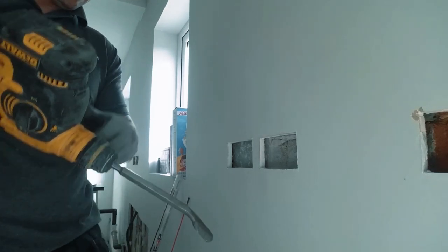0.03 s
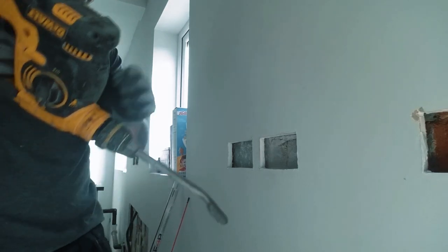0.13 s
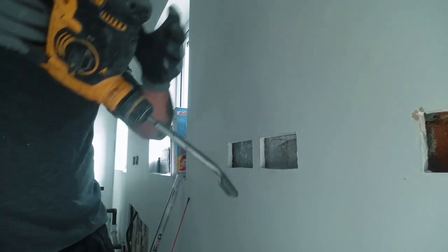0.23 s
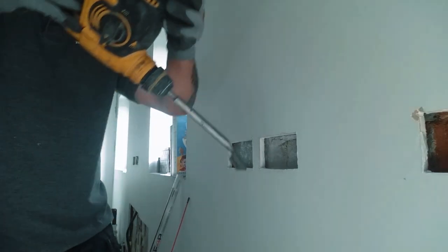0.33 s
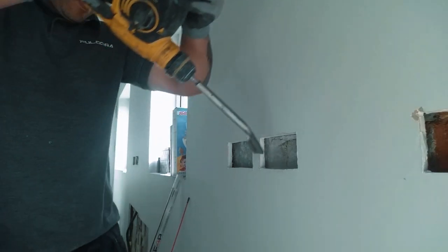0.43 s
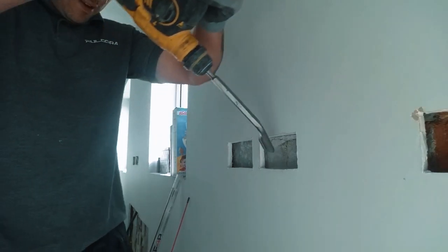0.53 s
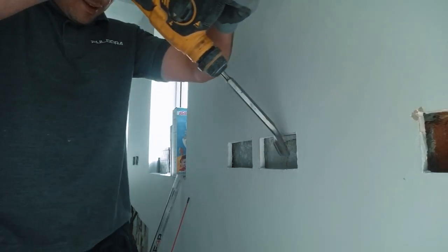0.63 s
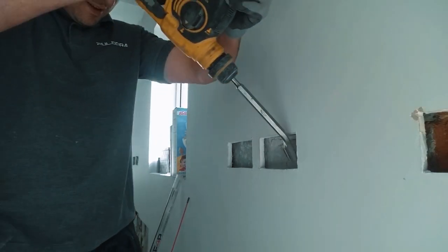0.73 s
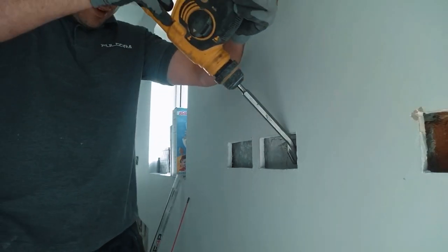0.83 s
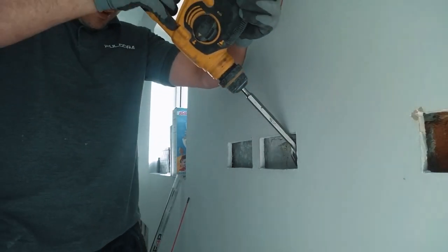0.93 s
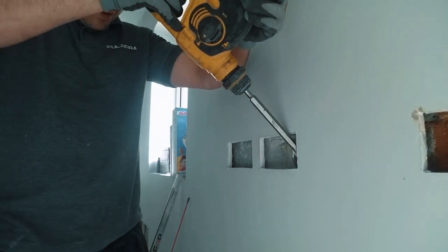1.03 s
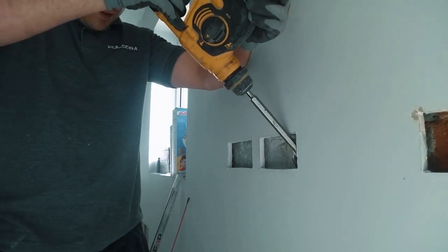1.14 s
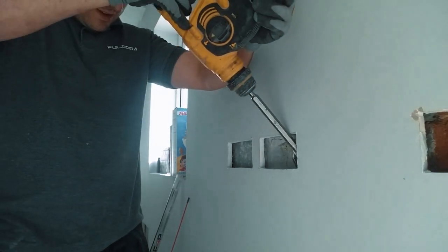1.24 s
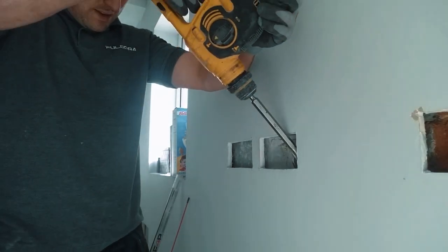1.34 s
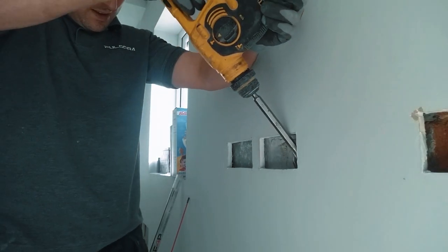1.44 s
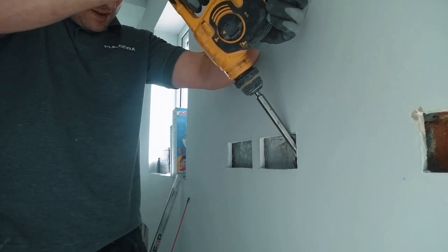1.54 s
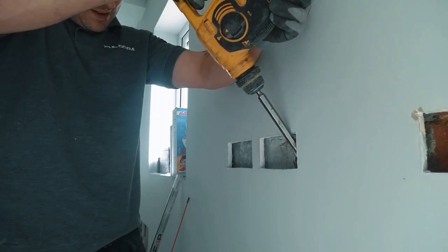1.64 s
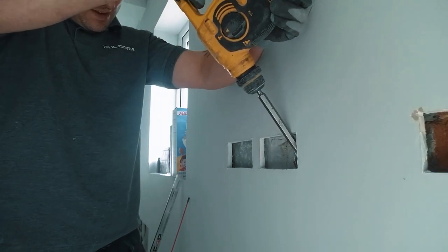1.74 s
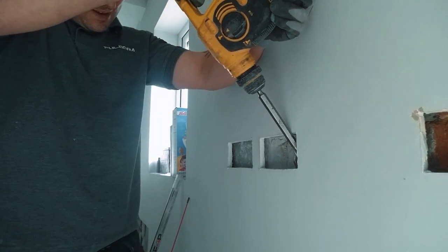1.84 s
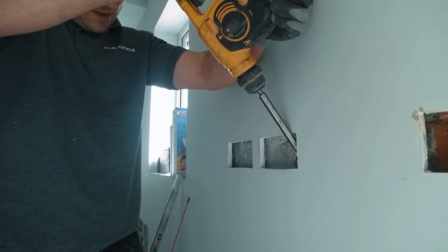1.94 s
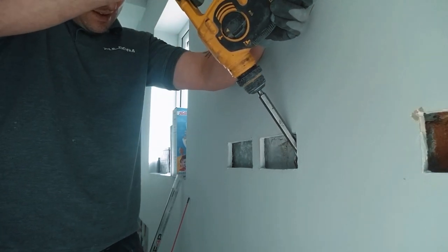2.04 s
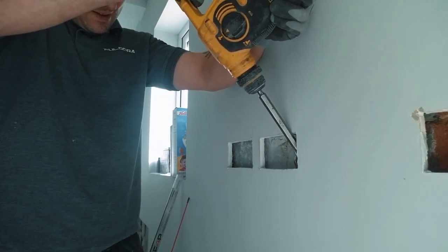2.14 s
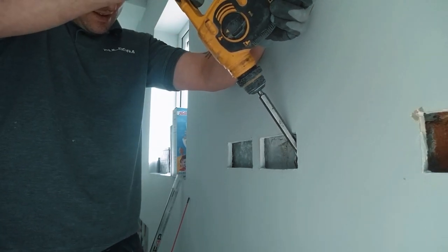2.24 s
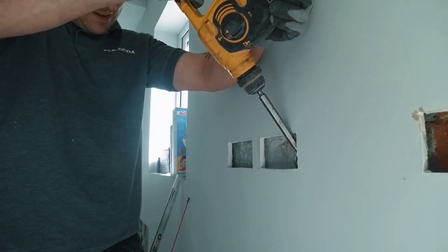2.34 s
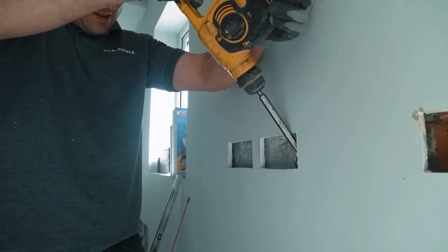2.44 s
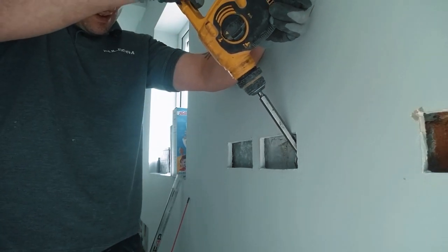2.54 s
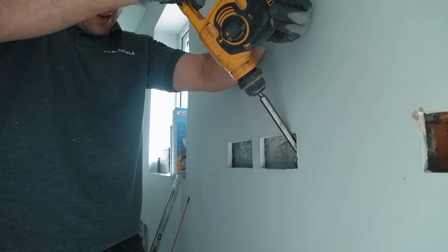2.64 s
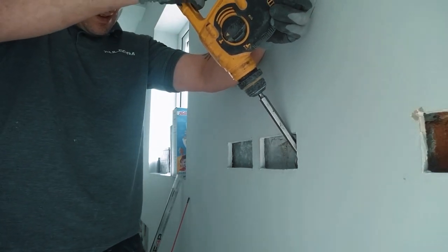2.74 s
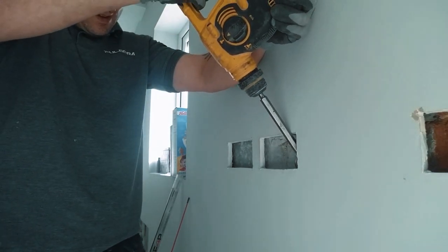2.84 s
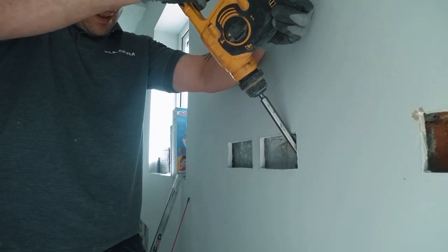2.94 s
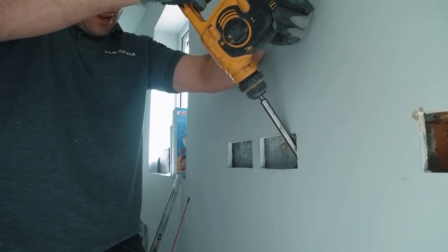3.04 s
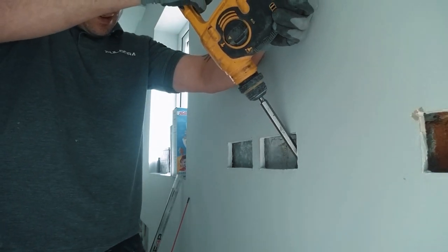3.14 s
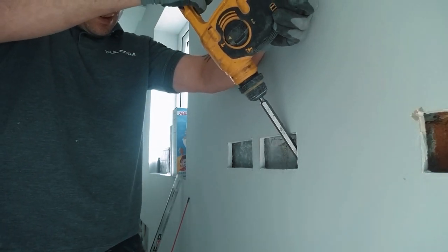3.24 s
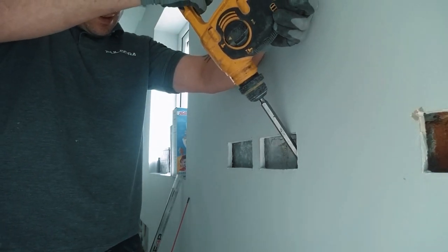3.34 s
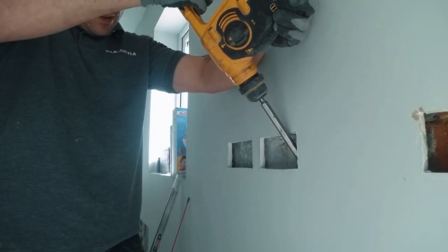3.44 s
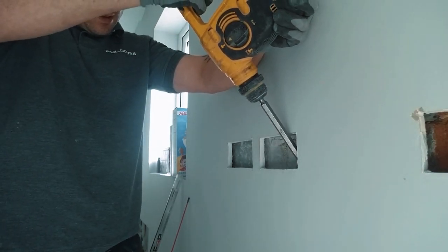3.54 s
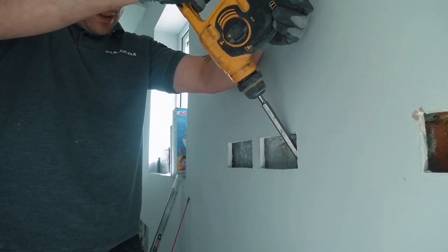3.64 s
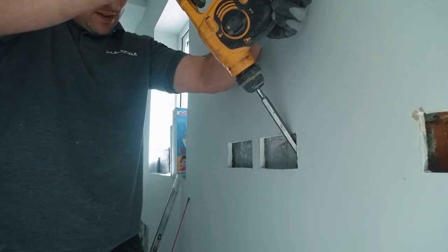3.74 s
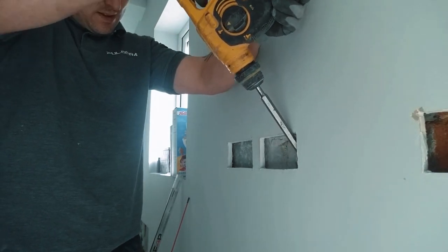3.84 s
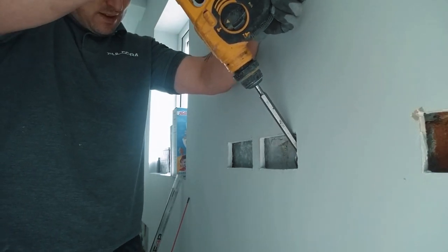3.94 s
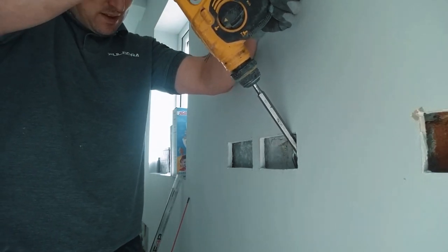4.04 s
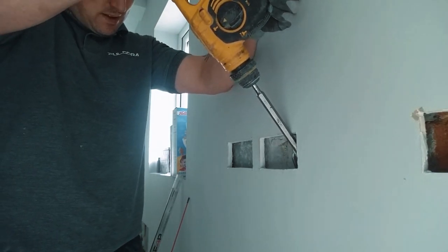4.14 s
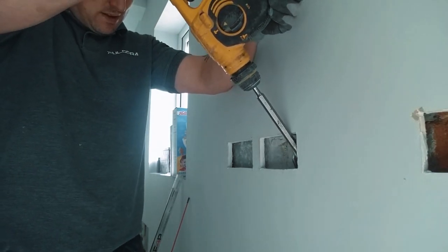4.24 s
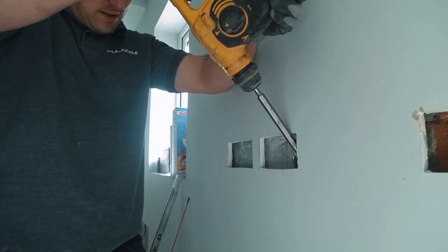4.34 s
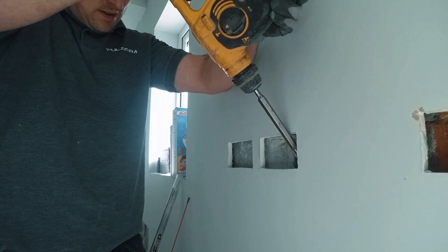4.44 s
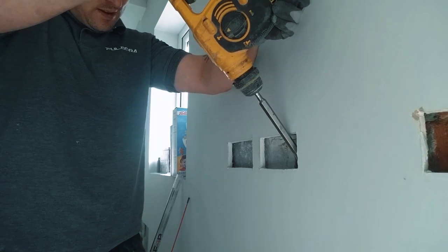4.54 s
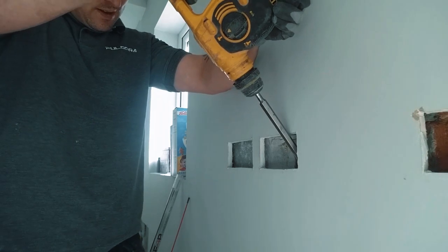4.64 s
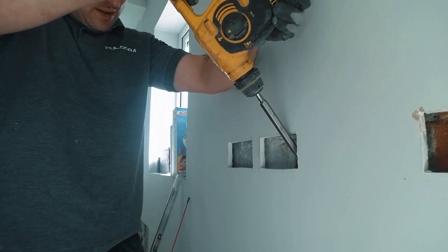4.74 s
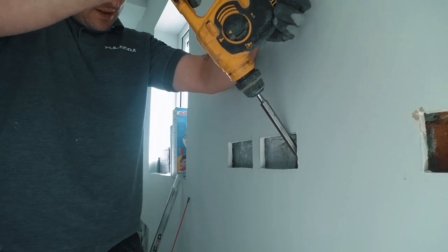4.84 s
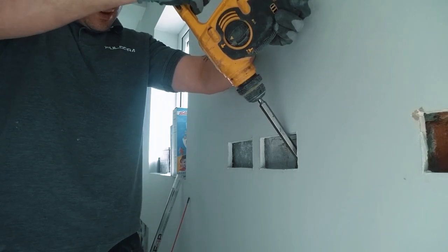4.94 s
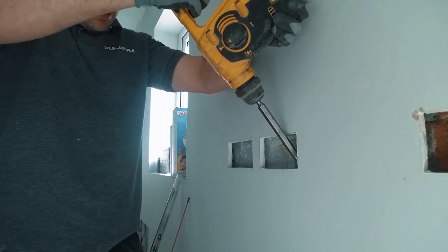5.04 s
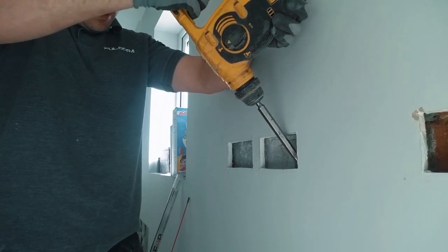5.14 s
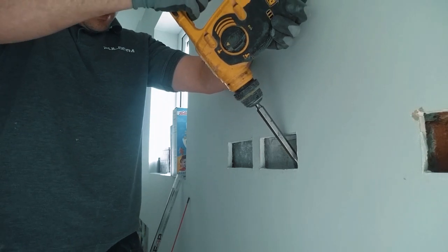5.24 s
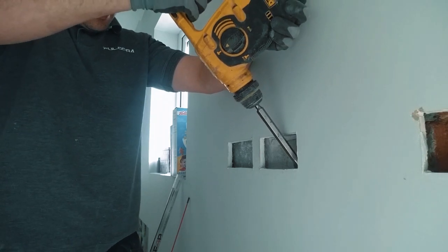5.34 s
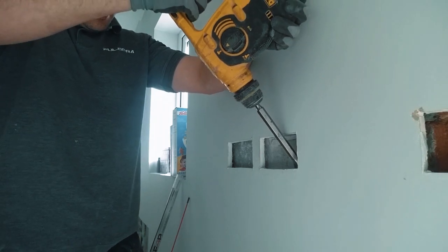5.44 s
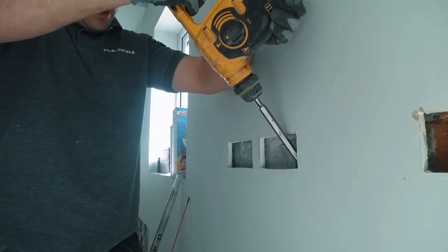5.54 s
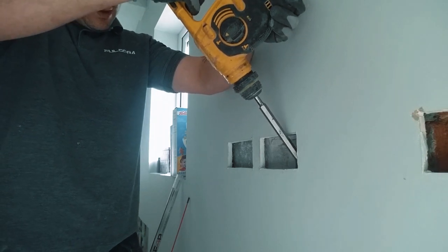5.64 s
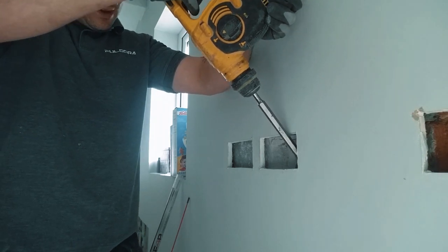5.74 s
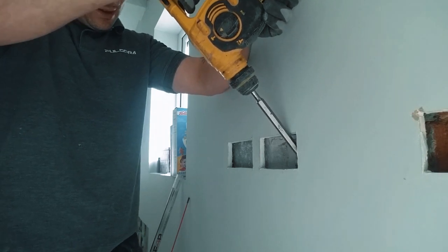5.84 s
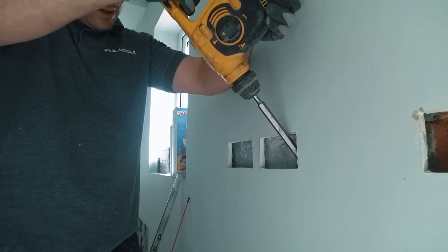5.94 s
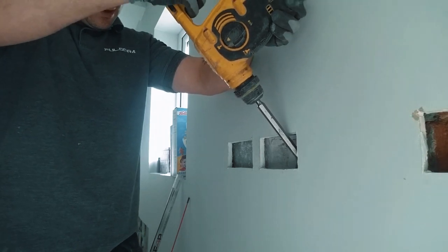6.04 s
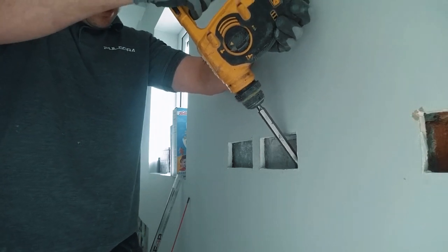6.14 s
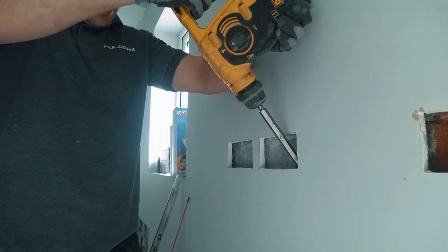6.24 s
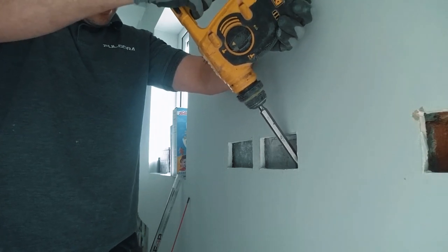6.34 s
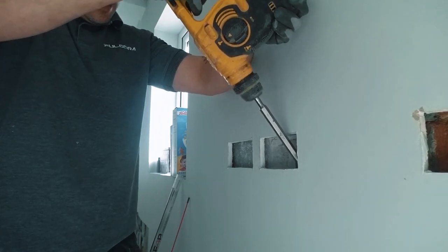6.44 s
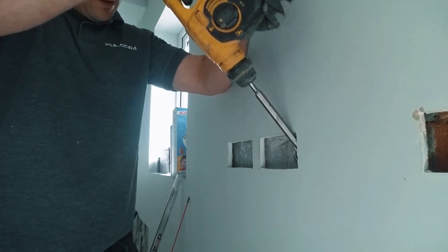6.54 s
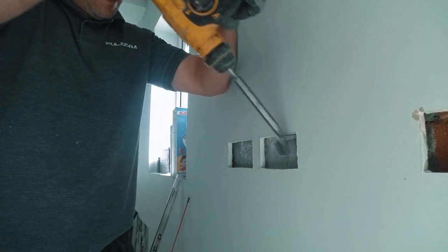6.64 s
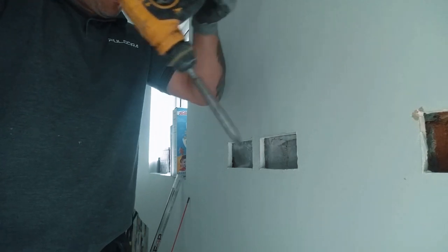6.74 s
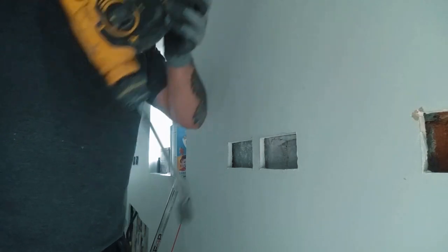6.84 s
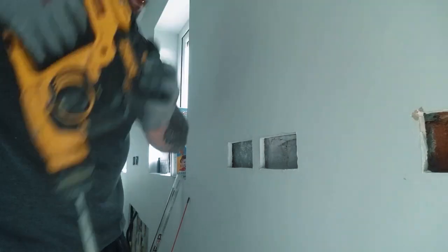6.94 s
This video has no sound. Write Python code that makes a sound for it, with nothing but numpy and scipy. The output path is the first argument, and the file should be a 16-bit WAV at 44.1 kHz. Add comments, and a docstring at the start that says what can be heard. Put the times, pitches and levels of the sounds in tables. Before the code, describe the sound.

A cordless power hammer chisels a plaster wall in a bare, reverberant room, close and slightly to the left. At the start cloth rubs briefly and the tool clacks lightly. The bit meets the wall with a booming thud at about 0.9 seconds and a sharper knock at 1.4. Near 2 seconds the motor starts with a short high whine and loose, irregular blows. From 2.6 to 3.9 seconds it hammers very fast, with crunching plaster, snapping chips, a rasping steel bit and low thumps through the wall. After a pause with faint clicks, a second, slightly brighter burst runs from 4.5 to 5.8 seconds. A few clacks lead into a last short burst from about 6.2 to 6.6. Each burst ends in slower, hollow blows as the motor runs down. Two lighter handling knocks follow at about 6.7 and 6.9 seconds, over faint hiss.

```python
"""A cordless hammer chisels a recess in the plastered wall of a bare, reverberant room.
First cloth rubs as the tool is lifted, and the bit is knocked into place, exciting the wall's modes.
Near 2 s the motor starts with a whine and the striker catches loosely; then it hammers about 59 times
a second. Each impact fractures plaster, rings the steel bit and thumps the wall. There are three bursts,
each ending in slower blows that ring the hollow housing. Last come two knocks as the tool is handled."""
import sys
import numpy as np
from scipy import signal
from scipy.fft import rfft, irfft
from scipy.io import wavfile
from scipy.ndimage import uniform_filter1d

SR = 44100
rng = np.random.default_rng(int(sys.argv[2]) if len(sys.argv) > 2 else 0)


def waveform_to_disk(signal):
    """Save audio, clipped to [-1, 1], as 16-bit WAV at the path in sys.argv[1]."""
    frames = np.transpose(np.atleast_2d(signal))
    scaled = np.clip(frames, -1, 1) * 32767
    samples = np.round(scaled).astype(np.int16)
    wavfile.write(sys.argv[1], SR, samples)


N = 308733

# Event levels are relative: each source adds its own offsets. Spectra and modes give shape only.
# background over time: time_s, hiss_db, rumble_db
BACKGROUND_LEVELS = [(0, -55.5, -60), (1.902, -58, -64.5), (3.8, -67.5, -61), (4.001, -60.5, -95),
                     (7, -70, -86)]
# spectra of the background and of rubbing cloth: frequency_hz, level_db
HISS_SPECTRUM = [(60, -35), (120, -2), (300, 0.5), (650, -4.5), (1300, -9), (2600, -15.5), (5000, -21.5),
                 (16000, -30)]
RUMBLE_SPECTRUM = [(15, -39.5), (28, -7.5), (55, -8.5), (110, -6.5), (250, -31.5), (600, -63)]
CLOTH_SPECTRUM = [(120, -50), (200, 2), (380, -13), (409, -13), (722, -1.5), (1040, -15), (3620, -8),
                  (16000, -33)]
# contacts of bit and housing while handled: start_s, clack_db, thud_db, tick_db
KNOCKS = [(0.016, -44, -39.5, -46), (.080, -36.5, -58, -52), (0.113, -50, -64, -40), (0.152, -33, -38, -58),
          (.369, -41, -33.5, -47), (0.386, -34.5, -52, -41), (0.538, -45, -53, -45),
          (.688, -42.5, -50.5, -52), (0.87, -40, -23.5, -55), (0.873, -20.5, -7, -35.5),
          (1.14, -35.5, -34, -42.5), (1.399, -19, -32.5, -32.5), (1.442, -44, -33, -35.5),
          (1.456, -29.5, -39, -55), (1.644, -36.5, -51, -51), (1.916, -42, -51, -67),
          (1.979, -26, -45, -55), (4.241, -44, -49.5, -85.5), (4.351, -51.5, -84, -69),
          (4.402, -56, -77, -53), (4.487, -41, -63, -49), (6.104, -47, -79, -41.5),
          (6.141, -37.5, -68, -44), (6.165, -33, -59, -44), (6.188, -31, -59.5, -30),
          (6.704, -30, -28.5, -54), (6.901, -45.5, -68, -59)]
# spectra of those contacts: frequency_hz, level_db
WALL_BUMP_SPECTRUM = [(40, -23), (85, -21), (140, -17), (240, -0.5), (450, -1), (700, -4.5), (1200, -18.5),
                      (3000, -66)]
HOUSING_CLACK_SPECTRUM = [(150, -4), (400, -8), (800, 7), (1200, 0), (1800, 0.5), (3300, -8), (6000, -28.5),
                          (14000, -32.5)]
STEEL_TICK_SPECTRUM = [(1500, -8), (3500, -3), (5200, -1), (8000, -12), (15000, -18)]
# normal modes of the struck bodies: pitch_hz, level_db, t60_s
WALL_MODES = [(129.5, -1.5, 0.28), (191.8, -6, 0.29), (297.7, -4.5, 0.21), (338, -2.5, .14),
              (365.6, -9, 0.29), (424, -10, 0.057), (485.7, -6, 0.26), (584, -7.5, 0.14), (666, -16, .17),
              (850, -17, 0.17), (942, -15, 0.16), (1341, -15.5, 0.13), (2417, -19.5, 0.11),
              (3660, -28.5, .12)]
FREE_BIT_MODES = [(1795, 2.5, .06), (3190, -3, 0.049), (5250, -2.5, .04)]
HOUSING_MODES = [(719, 0.5, 0.02), (780, -1.5, 0.024), (880, -12.5, 0.06), (985, -9, 0.01),
                 (1320, -20.5, .02)]
DRIVEN_BIT_MODES = [(4640, -0.5, 0.0071), (5990, -19.5, 0.043), (7850, -8.5, 0.028), (9050, -12, .02),
                    (11610, 5, 0.0081), (11880, -9, 0.061), (12600, -0.5, .008), (14000, 0, .008)]
# trigger pulls, one a burst: on_s, off_s, gear_db, whine_db, steel_db, bedded_crunch_scale_ms
TRIGGER_PULLS = [(1.95, 3.907, -28, -44, -25, 3.66), (4.456, 5.808, -27.5, -50, -22.5, 2.4),
                 (6.137, 6.62, -30, -66, -19.5, 7.3)]
# loose blows before the bit is pressed home: start_s, level_db, recoil_db
LOOSE_BLOWS = [(2.0397, -15.5, -11), (2.136, -11.5, -10), (2.1878, -10, -12), (2.2283, -10, -7),
               (2.266, -10, -13), (2.3017, -13.5, -19), (2.3371, -13.5, -20), (2.376, -11.5, -9.5),
               (2.411, -12, -12.5), (2.4476, -11.5, -19), (2.483, -10.5, -15.5), (2.5218, -9.5, -11.5),
               (2.5523, -15.5, -12.5), (4.533, -34, -18.5), (6.2377, -9, -30)]
# spectra of the working tool and the wall under it: frequency_hz, level_db
GEARBOX_SPECTRUM = [(100, -41), (300, -25.5), (480, -3.5), (600, -4), (680, 14), (770, -3.5), (900, -7),
                    (1300, -10), (1900, -13), (4000, -12.5), (8000, -54), (16000, -48)]
TOOL_BODY_SPECTRUM = [(40, -25.5), (110, -14.5), (220, -6.5), (400, -0.5), (600, 0.5), (1200, -11),
                      (3000, -49.5)]
MASONRY_CRACK_SPECTRUM = [(150, -22.5), (350, -7.5), (600, 3), (900, 3.5), (1300, 1.5), (1800, 2),
                          (2600, -5), (3500, -12.5), (5000, -7), (7000, -37), (16000, -37.5)]
EDGE_RASP_SPECTRUM = [(1500, -25.5), (2600, -1), (3300, 1.5), (4200, -4), (5300, -1), (6300, -2),
                      (7300, -10.5), (10000, -10.5), (16000, -53)]
GRIT_SPECTRUM = [(3000, -8), (6000, -48), (7200, 0), (8100, 1), (9000, -1), (10800, -0.5), (11850, 10),
                 (12600, 5.5), (13500, 3), (14500, 7.5), (16000, -11)]
WALL_THUMP_SPECTRUM = [(15, -22), (35, -2), (60, -2.5), (120, 2.5), (200, 1.5), (320, 2.5), (500, -4),
                       (900, -24.5), (2000, -68.5)]
# stereo balance of a blow: frequency_hz, left_minus_right_db
BLOW_BALANCE = [(300, 9), (700, 6.5), (1300, 6), (2400, 7), (4400, -4.5), (8000, 5), (12000, 0),
                (15000, 5.5)]
# bursts of hammering: start_s, blow_count, rate_hz, rate_change_hz_per_s, spin_up_lag_s
BURSTS = [(2.5767, 74, 60.72, -1.7, .0084), (4.5683, 66, 56.9, 3.24, .0072), (6.2615, 18, 59.5, 0, .008)]
# bearing on the tool, one table a burst: time_s, blow_db, thump_db, rasp_db
BEARING_LEVELS = [
    [(2.577, -29.5, -26.5, -25), (2.66, -25.5, -28, -30), (2.88, -25, -25.5, -26.0),
     (3.05, -25.5, -29.5, -28), (3.24, -26, -24, -26.5), (3.46, -26.5, -30.5, -27.5),
     (3.68, -20.0, -25.5, -23.5), (3.81, -24.5, -35, -25.5)],
    [(4.568, -26.5, -31, -27), (4.66, -25.5, -34.5, -27), (4.8, -25, -38, -23), (4.92, -26, -31.5, -25),
     (5.12, -21, -34, -25.0), (5.42, -20.5, -33.5, -24), (5.58, -24.5, -32.5, -26.5),
     (5.68, -25.5, -34.5, -21.5)],
    [(6.262, -21.0, -36.5, -23.5), (6.32, -20, -29, -21), (6.44, -21.5, -36, -26),
     (6.555, -25.5, -28.5, -25)],
]
# chips splitting off: start_s, level_db
CHIPS = [(2.5957, -2), (2.7008, -8.5), (2.7684, -6), (2.9002, -13.5), (4.6077, 1.5), (4.647, -4.5),
         (4.6788, 4), (4.7321, 6), (4.8004, 3), (4.8186, 2.5), (4.9762, 3), (5.683, -7), (6.2622, -13)]
# slower blows as the tool is eased off: start_s, housing_db, blow_db
EASING_BLOWS = [(3.825, -9.5, -21.5), (3.843, -28.5, -20.5), (3.873, -5.5, -27), (3.896, -39, -27.5),
                (5.7, -8.5, -21.5), (5.718, -12, -23.5), (5.735, -17, -21.5), (5.758, -15, -22),
                (5.781, -11, -24.5), (5.808, -16, -26), (6.579, -36, -24.5), (6.608, -10, -28.5)]
# reverberation time of the room: frequency_hz, t60_s
ROOM_T60 = [(100, 0.35), (260, 0.36), (700, 0.48), (1840, 0.51), (4850, 0.5), (8000, 0.37), (11500, 0.36),
            (15000, 0.28)]
# the bit slips and briefly rings more freely: time_s, extra_db; then the half-width of a slip
SLIPS, SLIP_S = [(5.17, 4.7), (6.58, 7.1)], 0.042


def from_db(db):
    """Amplitude grows tenfold for every 20 dB."""
    return 10 ** (np.asarray(db) / 20)


def rms_one(x):
    """Normalise to unit mean power."""
    return x / np.sqrt(np.mean(x ** 2) + 1e-20)


def unit_energy(x):
    """Normalise each response to unit energy."""
    return x / np.sqrt(np.sum(x ** 2, axis=-1, keepdims=True) + 1e-20)


def at_hz(points, hz):
    """Interpolate a spectrum on a logarithmic frequency axis."""
    frequencies, values = np.transpose(points)
    return np.interp(np.log(np.maximum(hz, 1)), np.log(frequencies), values)


def envelope(times, db):
    """Exponential growth or decay between given levels, with silence outside them."""
    return from_db(np.interp(np.arange(N) / SR, times, db, left=-200, right=-200))


def pan(db):
    """Interaural level difference: positive values place a source to the left."""
    return from_db(np.array([[.5], [-.5]]) * db)


def convolve(x, response):
    """A linear system convolves its input with its impulse response."""
    return signal.fftconvolve(np.atleast_2d(x), np.atleast_2d(response), axes=-1)[:, :N]


def colour(x, spectrum, balance=((1000, 0),), size=4096):
    """Minimum-phase filtering shapes the spectrum causally and keeps the power of white noise."""
    hz = np.arange(size // 2 + 1) * SR / size
    magnitude = from_db(at_hz(spectrum, hz)) * pan(at_hz(balance, hz))
    cepstrum = irfft(np.log(magnitude))
    cepstrum[:, 1:size // 2] *= 2
    cepstrum[:, size // 2 + 1:] = 0
    response = irfft(np.exp(rfft(cepstrum)))
    return convolve(x, rms_one(response) / np.sqrt(size))


def stereo_noise(size, alike):
    """Partial coherence: a common part gives two noises the correlation `alike`."""
    common = rng.standard_normal(size)
    return np.sqrt(alike) * common + np.sqrt(1 - alike) * rng.standard_normal((2, size))


def ring(x, modes):
    """Modal superposition: a struck body responds as a sum of damped sinusoids."""
    t = np.arange(SR // 2) / SR
    waves = [(-1) ** k * from_db(db - 60 * t / t60) * np.sin(2 * np.pi * hz * t)
             for k, (hz, db, t60) in enumerate(modes)]
    return convolve(x, unit_energy(sum(waves)))


def impacts(times, db, decay_ms, repeat, alike, rise_ms=0.013, size=2048):
    """Micro-fractures sum to a decaying noise burst per contact; db is the rms over 1/60 s."""
    out, ms = np.zeros((2, N + size)), np.arange(size) * 1000 / SR
    grains = stereo_noise(size, alike)
    attack = 1 - np.exp(-ms / rise_ms)
    for start_s, gain, decay in zip(*np.broadcast_arrays(times, from_db(db), decay_ms)):
        # `repeat` is the correlation of each burst with the one before
        grains = repeat * grains + np.sqrt(1 - repeat ** 2) * stereo_noise(size, alike)
        at = int(np.clip(start_s * SR, 0, N - 1))
        out[:, at:at + size] += gain * unit_energy(grains * np.exp(-ms / decay) * attack)
    return out[:, :N] * np.sqrt(SR / 60)


def impulses(times, db):
    """An ideal impulse per contact excites all frequencies equally; db is the rms over 1/60 s."""
    out = np.zeros(N)
    out[np.clip(times * SR, 0, N - 1).astype(int)] = from_db(db)
    return out * np.sqrt(SR / 60)


def background():
    """Filtered random noise: a faint hiss and rumble, weaker toward the end."""
    times, hiss_db, rumble_db = np.transpose(BACKGROUND_LEVELS)
    hiss = envelope(times, hiss_db) * colour(stereo_noise(N, 0.31), HISS_SPECTRUM)
    rumble = envelope(times, rumble_db) * colour(stereo_noise(N, 0.66), RUMBLE_SPECTRUM)
    return hiss + rumble


def cloth_rub(peak_s=.15, peak_db=-40, rise_db_per_s=126, fall_db_per_s=380):
    """Sliding friction of sleeve and glove on the tool gives one swell of noise."""
    t = np.arange(N) / SR - peak_s
    gain = from_db(peak_db + np.minimum(rise_db_per_s * t, -fall_db_per_s * t))
    return gain * colour(stereo_noise(N, 0.17), CLOTH_SPECTRUM)


def knocks(lowest_hz=110, give_s=.0015):
    """Impact excitation: housing and steel sound at once; the plaster yields, then the wall booms."""
    times, clack_db, thud_db, tick_db = np.transpose(KNOCKS)
    push = impulses(times + give_s, thud_db - 5)
    contact = push + impacts(times, thud_db - 18, decay_ms=8.7, repeat=0, alike=0.97)
    highpass = signal.butter(2, lowest_hz, "high", fs=SR, output="sos")
    boom = signal.sosfilt(highpass, ring(contact, WALL_MODES))
    bump = impacts(times + give_s, thud_db - 8.5, decay_ms=8.4, repeat=0, alike=0.24)
    clack = impacts(times, clack_db - 11, decay_ms=13, repeat=0, alike=0.49)
    tick = impacts(times, tick_db - 10, decay_ms=13, repeat=0, alike=0.21)
    clink = ring(impulses(times, tick_db - 16), FREE_BIT_MODES)
    wall = boom + colour(bump, WALL_BUMP_SPECTRUM)
    tool = colour(clack, HOUSING_CLACK_SPECTRUM) + colour(tick, STEEL_TICK_SPECTRUM) + clink
    return wall * pan(4), tool * pan(4.1)


def controller_whine(pitch_hz=3860, waver_hz=40, octave_db=-11, attack_s=.04, fall_db_per_s=500.5):
    """The speed controller sings a frequency-modulated tone until the motor is under load."""
    t, gain = np.arange(N) / SR, 0
    for (on_s, _, _, whine_db, *_), (loaded_s, *_) in zip(TRIGGER_PULLS, BURSTS):
        attack = np.clip((t - on_s) / attack_s, 0, 1)
        gain = gain + attack * from_db(whine_db - fall_db_per_s * np.maximum(t - loaded_s, 0))
    waver = rms_one(uniform_filter1d(rng.standard_normal(N), size=100))
    phase = 2 * np.pi * np.cumsum(pitch_hz + waver_hz * waver) / SR
    return gain * (np.sin(phase) + from_db(octave_db) * np.sin(2 * phase))


def gear_gain(t, slack_s=0.016, spin_up_s=0.024, spin_up_db=20, idle_db=-3, fall_db_per_s=411.5):
    """Backlash and inertia: the gears take up slack, swell, take the load and run down on release."""
    gain = 1e-9
    for (on_s, off_s, gear_db, *_), (loaded_s, *_) in zip(TRIGGER_PULLS, BURSTS):
        age = t - on_s - slack_s
        swell_db = -spin_up_db * np.exp(-np.maximum(age, 0) / spin_up_s) + idle_db * (t < loaded_s)
        run_down_db = fall_db_per_s * np.maximum(t - off_s, 0)
        gain = gain + (age > 0) * from_db(gear_db + swell_db - run_down_db)
    return gain


def motor(times, recoil_s=.011):
    """Forced vibration: gears rattle in the hollow housing, and each driven blow's recoil rings it."""
    gear_db = 20 * np.log10(gear_gain(times))
    shudder = impacts(times + recoil_s, gear_db - 3.5, decay_ms=3.6, repeat=0.48, alike=0.72)
    recoil = shudder + impulses(times + recoil_s, gear_db - 3.5)
    rattle = from_db(-5) * gear_gain(np.arange(N) / SR) * stereo_noise(N, 0.73)
    housing = from_db(-14.5) * ring(recoil, HOUSING_MODES)
    return (colour(rattle + recoil, GEARBOX_SPECTRUM) + housing) * pan(7.3)


def chisel(crack, rasp, steel, grit_db=-1, bit_db=-5):
    """Source and filter: masonry cracks in the mid range, the edge rasps above, grit and bit on top."""
    masonry = colour(crack, MASONRY_CRACK_SPECTRUM, BLOW_BALANCE)
    edge = colour(rasp, EDGE_RASP_SPECTRUM, BLOW_BALANCE)
    grit = from_db(grit_db) * colour(steel, GRIT_SPECTRUM, BLOW_BALANCE)
    t = np.arange(N) / SR
    slip_db = sum(extra_db * np.exp(-((t - time_s) / SLIP_S) ** 2) for time_s, extra_db in SLIPS)
    bit = ring(steel * from_db(bit_db + slip_db), DRIVEN_BIT_MODES) * pan(10)
    return masonry + edge + grit + bit


def loose_blows(bounce_s=.015):
    """Elastic rebound: the unloaded striker catches irregularly and the bit bounces in the chuck."""
    times, db, _ = np.transpose(LOOSE_BLOWS)
    hit = impacts(times, db - 15, decay_ms=20, repeat=0.61, alike=0.48)
    hit += impacts(times, db - 24.5, decay_ms=5.4, repeat=0.98, alike=1)
    bounce_times = times + bounce_s + rng.normal(0, 0.0018, len(times))
    bounce = impacts(bounce_times, db - 17.5, decay_ms=3.8, repeat=0.18, alike=0.38)
    edge = impacts(times, db - 14, decay_ms=5.4, repeat=0.24, alike=0.58) + from_db(-1.5) * bounce
    steel = impacts(times, db - 15.5, decay_ms=4.1, repeat=0.33, alike=0.27) + from_db(-8) * bounce
    body = from_db(-5.5) * colour(hit + bounce, TOOL_BODY_SPECTRUM) * pan(5.7)
    return body + chisel(hit + bounce, edge, steel, grit_db=-2.6, bit_db=-26.5)


def free_recoil(recoil_s=.0095):
    """Momentum transfer: after a loose blow the striker flies back and rings the gear housing."""
    times, _, recoil_db = np.transpose(LOOSE_BLOWS)
    kick = impulses(times + recoil_s, recoil_db - 16)
    shudder = impacts(times + recoil_s, recoil_db - 17.5, decay_ms=2.4, repeat=0.96, alike=0.73)
    return colour(kick + shudder, GEARBOX_SPECTRUM) * pan(7.5)


def driven_blows(spin_up_blows=2, bed_in_s=0.12, fresh_scale_ms=2.4, widening_db_per_s=3):
    """A nearly periodic impact train: start_s, blow_db, thump_db, rasp_db, steel_db, crunch_scale_ms."""
    runs = []
    for burst, bearing, pull in zip(BURSTS, BEARING_LEVELS, TRIGGER_PULLS):
        start_s, count, rate_hz, change_hz_per_s, lag_s = burst
        *_, steel_db, bedded_scale_ms = pull
        k = np.arange(count)
        age = k / rate_hz - .5 * change_hz_per_s / rate_hz * (k / rate_hz) ** 2
        age += lag_s * (1 - np.exp(-k / spin_up_blows))
        bearing_s, *levels = np.transpose(bearing)
        blow_db, thump_db, rasp_db = [np.interp(start_s + age, bearing_s, db) for db in levels]
        # hard plaster makes the first blows short and bright; then the bit beds into its own grit
        fresh = np.exp(-age / bed_in_s)
        crunch_scale_ms = fresh_scale_ms * fresh + bedded_scale_ms * (1 - fresh)
        # the steel follows the force of the blow and rings more freely as the recess widens
        force_db = 0.13 * (blow_db - blow_db.mean())
        steel_db = steel_db + force_db + widening_db_per_s * (age - age.mean()) + 2.5 * fresh
        times = start_s + age + rng.normal(0, .0003, count)   # the free striker lands early or late
        runs.append([times, blow_db + 0.2, thump_db + 1.2, rasp_db + 0.8, steel_db, crunch_scale_ms])
    return np.hstack(runs)


def hammering(times, blow_db, rasp_db, steel_db, crunch_scale_ms, uneven_db=1.09):
    """Brittle fracture: each blow, of uneven force, is a sharp strike and then a crunch of plaster."""
    force_db = rng.normal(0, uneven_db, len(times))
    blow_db, rasp_db, steel_db = blow_db + force_db, rasp_db + force_db, steel_db + force_db
    scale_ms = crunch_scale_ms * from_db(rng.normal(0, 2.5, len(times)))
    strike = impacts(times + .00026, blow_db, decay_ms=0.92, repeat=0.46, alike=0.15)
    crunch = impacts(times + .0008, blow_db + 1.5, scale_ms * 1.44, repeat=0.46, alike=0.14, rise_ms=0.63)
    rasp = impacts(times + .00021, rasp_db + 2, scale_ms * 2.2, repeat=0.19, alike=0.12, rise_ms=0.41)
    steel = impacts(times + .0002, steel_db + 1, scale_ms, repeat=0.27, alike=0.074)
    return chisel(strike + crunch, rasp, steel)


def wall_thumps(times, thump_db, uneven_db=2.5, lag_s=.0025):
    """Structure-borne sound: each blow gives the wall a low push and a shudder, mostly on the left."""
    db = thump_db + rng.normal(0, uneven_db, len(times))
    push_times = times + lag_s + rng.normal(0, 0.00067, len(times))
    push = impulses(push_times, db - 7) * pan(19.4)
    shudder = impacts(times + 0.00094, db - 5.5, decay_ms=4.2, repeat=0.14, alike=0.1) * pan(15)
    return colour(push + shudder, WALL_THUMP_SPECTRUM)


def chips():
    """Sudden fracture: a chip splits off with a short, bright snap."""
    times, db = np.transpose(CHIPS)
    snap = impacts(times, db - 22.5, decay_ms=1, repeat=0, alike=0.26)
    edge = impacts(times, db - 23, decay_ms=6.4, repeat=0, alike=.4)
    return chisel(snap, edge, from_db(-12.5) * edge)


def easing_blows(delay_s=0.0028):
    """Resonance: eased off the wall, each blow only grazes the plaster and rings the hollow housing."""
    times, housing_db, blow_db = np.transpose(EASING_BLOWS)
    jolt = impacts(times + delay_s, housing_db - 11.5, decay_ms=4.3, repeat=0.42, alike=0.84)
    graze = hammering(times, blow_db, rasp_db=blow_db - 0.5, steel_db=blow_db - 15, crunch_scale_ms=2.4)
    return ring(jolt, HOUSING_MODES) * pan(6.9) + graze


def delay_right(x, lag_s=.00018):
    """Interaural time difference: sound from a tool on the left reaches the right ear later."""
    n = np.arange(N)
    return np.array([x[0], np.interp(n - lag_s * SR, n, x[1])])


def room(x, onset_s=0.0039):
    """Reverberation: diffuse reflections from bare plaster decay exponentially, band by band."""
    t = np.arange(SR) / SR
    hz, centres_hz = np.arange(SR // 2 + 1), np.geomspace(100, 15000, 10)
    white, tail = rfft(stereo_noise(SR, 0.15)), 0
    for centre_hz, share in zip(centres_hz, np.eye(len(centres_hz))):
        band = irfft(white * at_hz(np.c_[centres_hz, share], hz), SR)
        tail = tail + band * from_db(-60 * t / at_hz(ROOM_T60, centre_hz))
    fade_in = np.clip(t / onset_s - .5, 0, 1)
    return convolve(x, unit_energy(tail * fade_in))


def scene():
    """Superposition of airborne sound, wall vibration, reverberation and a faint background."""
    times, blow_db, thump_db, rasp_db, steel_db, crunch_scale_ms = driven_blows()
    thuds, clacks = knocks()
    blows = hammering(times, blow_db, rasp_db, steel_db, crunch_scale_ms)
    tool = blows + loose_blows() + free_recoil() + motor(times) + controller_whine()
    airborne = delay_right(tool + chips() + easing_blows()) + clacks + cloth_rub()
    thumps = wall_thumps(times, thump_db)
    echoes = room(from_db(-6.5) * airborne + from_db(-8) * thuds + from_db(-31.5) * thumps)
    return airborne + thuds + thumps + echoes + background()


def record(dry):
    """Soft saturation rounds the hardest peaks; a steep low-pass cuts the highest treble."""
    cutoff_hz = 16350
    saturated = dry / (1 + dry ** 8) ** (1 / 8)
    lowpass = signal.ellip(10, .1, 70, cutoff_hz, fs=SR, output="sos")
    return signal.sosfilt(lowpass, saturated)


dry = scene()
out = record(dry)
waveform_to_disk(out)
```